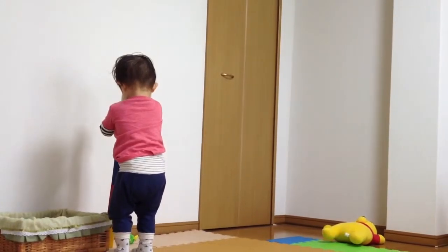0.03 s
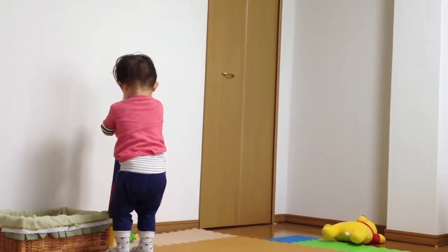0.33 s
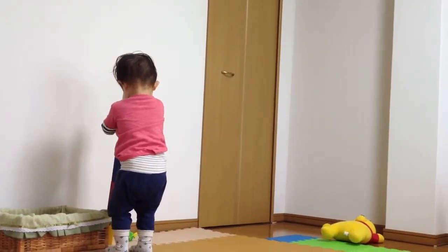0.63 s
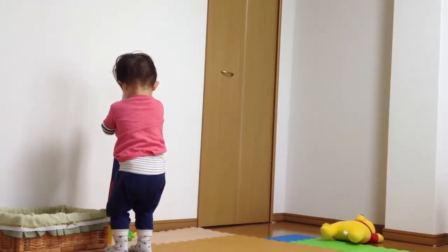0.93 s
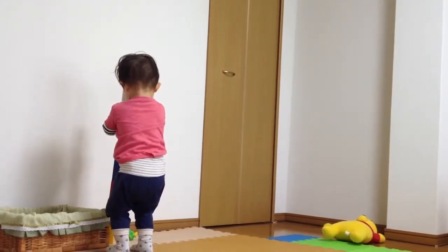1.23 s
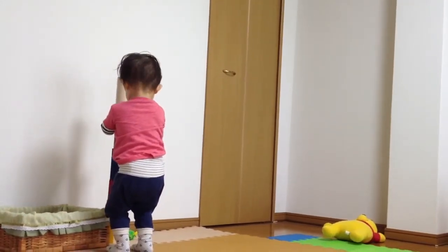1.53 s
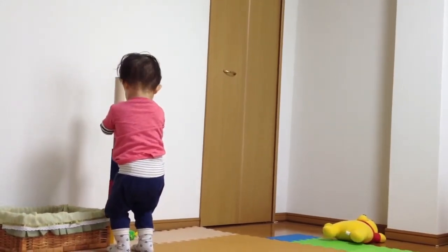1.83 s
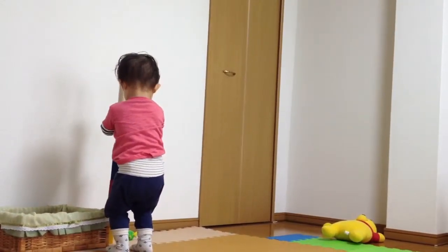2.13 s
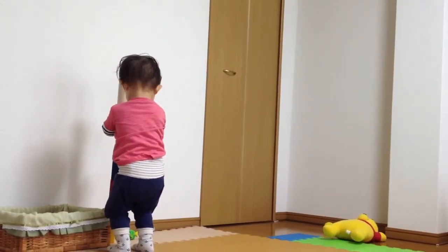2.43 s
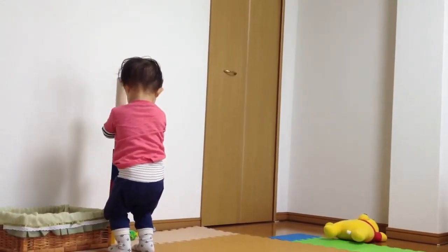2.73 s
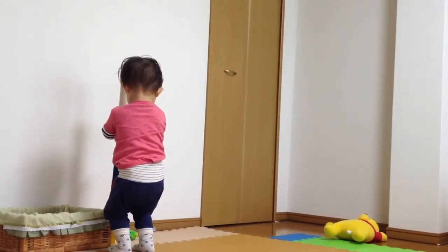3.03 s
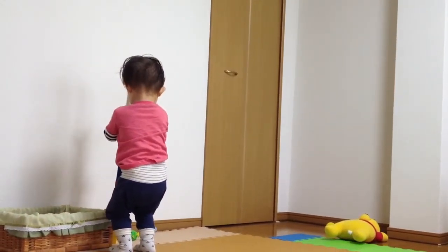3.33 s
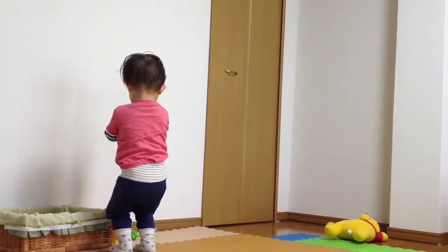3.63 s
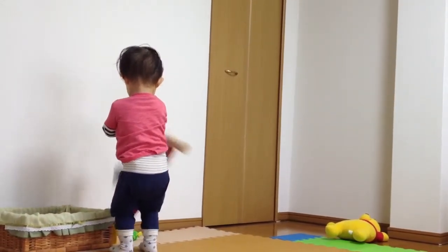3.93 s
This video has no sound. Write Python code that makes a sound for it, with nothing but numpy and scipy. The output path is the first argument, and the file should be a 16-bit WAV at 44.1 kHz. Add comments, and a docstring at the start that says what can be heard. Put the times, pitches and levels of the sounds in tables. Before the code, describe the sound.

Hollow toy blocks crash onto the floor at the very end. Before that, a quiet bare room gives only faint hiss and hum, then tiny ticks and soft knocks as the stack slips, heard from a short distance.

```python
"""A quiet, bare-walled room, where a toddler handles a tower of toy blocks.
The stack ticks as it shifts, a block slips with soft knocks, and blocks crash to the floor.
Each impact radiates a short broadband crack and excites the damped modes of a hollow block.
The close walls return echoes and reverberation; a low hum and a faint hiss lie underneath."""
import sys
import numpy as np
from scipy import signal
from scipy.fft import rfft, irfft
from scipy.io import wavfile

SR = 44100
rng = np.random.default_rng(int(sys.argv[2]) if len(sys.argv) > 2 else 0)


def to_wav(s):
    """Save 16-bit WAV."""
    ch = np.atleast_2d(s).T  # columns
    pcm = np.round(np.clip(ch, -1, 1) * 32767)  # PCM
    wavfile.write(sys.argv[1], SR, pcm.astype(np.int16))


N = 176400

# Blocks hitting the floor and each other (time [s], relative level [dB], bass [dB], treble [dB])
CRASH_IMPACTS = [(3.9132, -24.5, 7, -12.5), (3.9154, -26.5, 2, -2), (3.9198, -24, -2, -10),
                 (3.9212, -33, 0.5, 7.5), (3.9235, -24, -2.5, -6.5), (3.9260, -29, -3, 1),
                 (3.9320, -36, -4, -1), (3.9485, -31.5, -5.5, -13), (3.9600, -36, -9, -11),
                 (3.9720, -28.5, -7, -7.5), (3.9747, -32, 2, 5.5), (3.9786, -25.5, -3, -3)]
# Spectral envelope of a hard impact (frequency [Hz], gain [dB])
CRASH_SPECTRUM = [(40, -48), (90, -33), (155, -3.5), (290, -18.5), (460, -2.5), (660, -2), (810, -3.5),
                  (1050, 0.5), (1400, 2), (2350, 0.5), (2900, -7), (3700, -6.5), (4600, -1.5), (6400, -5),
                  (8000, -22.5), (12500, -20.5), (15500, -40)]
def crash():
    """Hard impact: brief contact spreads energy far into the treble."""
    return impacts(CRASH_IMPACTS, CRASH_SPECTRUM, ring_db=-2.5, wet_db=0)


# Knocks of the slipping block (time [s], relative level [dB], bass [dB], treble [dB])
SLIP_IMPACTS = [(3.7570, -54, -5, -11), (3.7682, -45, -5, -3), (3.7755, -43.5, -1.5, -12),
                (3.7872, -48.5, 7, -6), (3.7898, -49, 0.5, -7), (3.8030, -53, 1, -1)]
# Spectral envelope of a soft impact (frequency [Hz], gain [dB])
SLIP_SPECTRUM = [(40, -34), (90, -24), (150, -5), (300, -20), (470, -7), (1000, -4), (1300, -4.5),
                 (1900, 0.5), (2550, -6.5), (3000, -19), (6000, -21.5), (15000, -38)]
def slip():
    """Soft impact: longer contact excites little treble."""
    return impacts(SLIP_IMPACTS, SLIP_SPECTRUM, ring_db=-1.5, wet_db=-3.5)


# Modes of a hollow block (frequency [Hz], relative level [dB], T60 [s])
BLOCK_MODES = [(465, -3, .3), (673, -5, .25), (950, -3, .2), (1031, -3, .18), (1313, 2, .18),
               (1512, -4, .18), (1645, -4, .2), (1782, -1, .2), (2156, -6, .2), (2285, -5, .2),
               (2376, -5, .2), (2620, -3, .25), (3180, -7, .15), (3290, -4, .15), (4500, -6, .1),
               (4925, -6, .18), (6320, -7, .2)]
def impacts(rows, spectrum, ring_db, wet_db, size=22050):
    """Impulse excitation: each blow sends a crack into the room and leaves the block's modes ringing."""
    out, t = np.zeros(N), np.arange(size) / SR
    bass_hz, treble_hz = 790, 2980
    for start, db, bass_db, treble_db in rows:
        burst = rng.standard_normal(size) * decay(t, t60=0.0099)
        crack = unit_energy(colour(burst, spectrum))
        ring = 0
        for hz, mode_db, t60 in BLOCK_MODES:
            detune = 1 + 0.0037 * rng.standard_normal()
            cycles = hz * detune * t + rng.random()
            amplitude = undb(mode_db + value_at(spectrum, hz) / 2)
            ring = ring + amplitude * decay(t, t60) * np.sin(2 * np.pi * cycles)
        # Each blow comes from its own place, so it has its own echoes.
        hit = signal.fftconvolve(crack, room_response(t, wet_db))[:size]
        hit += undb(ring_db) * unit_energy(ring)
        shelves = [(bass_hz, bass_db), (treble_hz / 2, 0), (treble_hz, treble_db)]
        add(out, 10 * undb(db) * colour(hit, shelves), start)
    return out


# Ticks of the shifting stack (time [s], relative level [dB], treble [dB])
STACK_TICKS = [(3.5197, -66, -2), (3.5791, -60.5, 1.5), (3.6415, -61.5, 0), (3.7044, -59, -3.5)]
# Spectral envelope of a tick (frequency [Hz], gain [dB])
TICK_SPECTRUM = [(300, -3), (2000, 6.5), (3500, -8), (6000, 4), (9000, -2), (15000, -9)]
def ticks(size=11025, treble_hz=8000):
    """Stick-slip friction: each tiny slip between stacked blocks releases a burst of noise."""
    out, t = np.zeros(N), np.arange(size) / SR
    for start, db, treble_db in STACK_TICKS:
        burst = rng.standard_normal(size) * decay(t, t60=0.0082)
        click = unit_energy(colour(burst, TICK_SPECTRUM))
        click = colour(click, [(treble_hz / 2, 0), (treble_hz, treble_db)])
        click = signal.fftconvolve(click, room_response(t, wet_db=-1))[:size]
        add(out, 10 * undb(db) * click, start)
    return out


# Reverberation time of the room (frequency [Hz], T60 [s])
REVERB_TIMES = [(150, 1), (1500, 0.54), (5000, 0.35), (13000, 0.35)]
def room_response(t, wet_db, first_echo_s=0.0041, echoes_per_s=590):
    """Reflection and absorption: direct sound, early echoes and a diffuse tail whose treble dies first."""
    hz = np.arange(len(t) // 2 + 1) * SR / len(t)
    noise = rfft(rng.standard_normal(len(t)))
    edges_hz = [0, 300, 700, 1500, 3000, 6000, 10000, SR / 2]
    tail = 0
    for lo, hi in zip(edges_hz, edges_hz[1:]):
        band = irfft(noise * (hz >= lo) * (hz < hi), len(t))
        tail = tail + band * decay(t, value_at(REVERB_TIMES, (lo + hi) / 2))
    arrivals = rng.random(len(t)) < echoes_per_s / SR
    echoes = arrivals * rng.standard_normal(len(t)) * decay(t, t60=0.07)
    onset = np.clip(t / first_echo_s - 1, 0, 1)
    response = undb(wet_db) * (unit_energy(tail * onset) + undb(-6.5) * unit_energy(echoes * onset))
    response[0] += 1  # direct sound
    return response


# Steady room noise (frequency [Hz], relative spectral density [dB])
HISS_SPECTRUM = [(20, -16), (45, -14.5), (70, -16), (100, -9), (135, -4), (195, -3), (280, -4.5),
                 (340, -5.5), (420, -10.5), (660, -9), (780, -13.5), (950, -12.5), (1500, -18),
                 (2120, -17.5), (2550, -24), (7000, -27), (10000, -32.5), (12500, -28), (15500, -27.5)]
def hiss():
    """Stationary noise: a continuous spectrum that falls towards the treble."""
    noise = colour(rng.standard_normal(N), HISS_SPECTRUM)
    return undb(-64.5) * noise / noise.std()


# Resonances of the room (frequency [Hz], bandwidth [Hz], level [dB])
ROOM_RESONANCES = [(147.9, 20.3, -72), (235.9, 16.6, -75), (555, 21.6, -80), (677, 20, -81),
                   (2045, 250, -84)]
def hum(waver_db=2):
    """Resonance: the room favours narrow bands of noise, each wavering in level."""
    out = np.zeros(N)
    for hz, width, db in ROOM_RESONANCES:
        bandpass = signal.butter(2, [hz - width / 2, hz + width / 2], "band", fs=SR, output="sos")
        band = signal.sosfilt(bandpass, rng.standard_normal(N))
        out += undb(db + waver_db * waver(rate_hz=6)) * band / band.std()
    return out


def whine(hz=12242, rms_db=-98):
    """Pure tone: one very faint, high sinusoid."""
    return undb(rms_db) * np.sqrt(2) * np.sin(2 * np.pi * hz * np.arange(N) / SR)


def waver(rate_hz):
    """Random modulation: low-passed noise with a standard deviation of 1."""
    hz = np.arange(N // 2 + 1) * SR / N
    slow = irfft(rfft(rng.standard_normal(N)) * np.exp(-(hz / rate_hz) ** 2), N)
    return slow / slow.std()


def undb(db):
    """Decibels to amplitude ratio."""
    return 10 ** (np.asarray(db) / 20)


def unit_energy(x):
    """Normalisation to an energy of 1."""
    return x / np.sqrt(np.sum(x ** 2))


def decay(t, t60):
    """Exponential damping: 60 dB lost in t60 seconds."""
    return np.exp(-np.log(1000) * t / t60)


def value_at(points, hz):
    """Interpolation of (frequency [Hz], value) points on a logarithmic frequency axis."""
    freqs, values = np.array(points, float).T
    return np.interp(np.log(np.maximum(hz, 1)), np.log(freqs), values)


def colour(x, points, size=4096):
    """Minimum-phase filtering through (frequency [Hz], gain [dB]) points."""
    hz = np.arange(size // 2 + 1) * SR / size
    cepstrum = irfft(np.log(undb(value_at(points, hz))))
    cepstrum[1:size // 2] *= 2  # folding the cepstrum makes the filter causal
    cepstrum[size // 2 + 1:] = 0
    response = irfft(np.exp(rfft(cepstrum)))
    return signal.fftconvolve(x, response)[:len(x)]


def add(out, x, start):
    """Mix a sound in at a time in seconds."""
    i = int(start * SR)
    out[i:i + len(x)] += x[:len(out) - i]


def scene():
    """Superposition: the blocks and the room noise sum in one channel."""
    blocks = slip() + crash()
    background = hiss() + hum() + whine()
    return (blocks + ticks() + background)[None]


def record(dry, low_hz=91, top_hz=15300):
    """Band limiting: filters remove the deep bass and the highest treble."""
    highpass = signal.butter(3, low_hz, "high", fs=SR, output="sos")
    lowpass = signal.ellip(10, .1, 70, top_hz, fs=SR, output="sos")
    return signal.sosfilt(lowpass, signal.sosfilt(highpass, dry))


dry = scene()
out = record(dry)
to_wav(out)
```